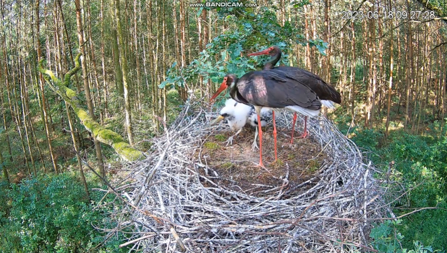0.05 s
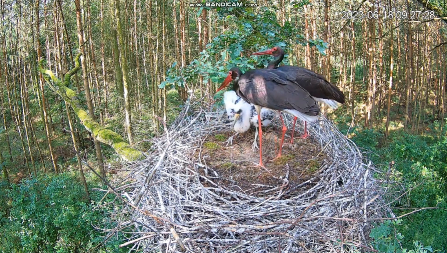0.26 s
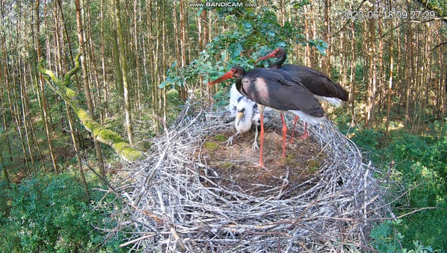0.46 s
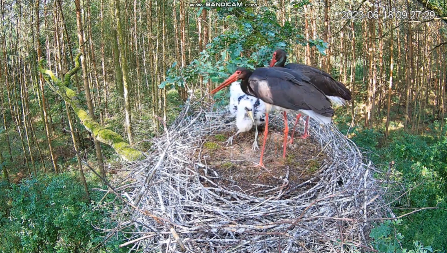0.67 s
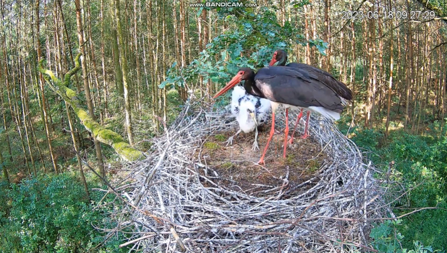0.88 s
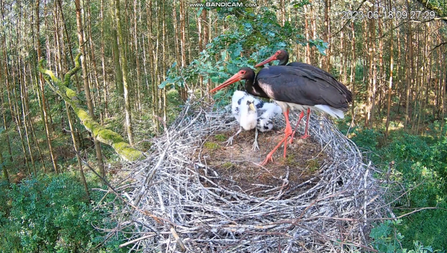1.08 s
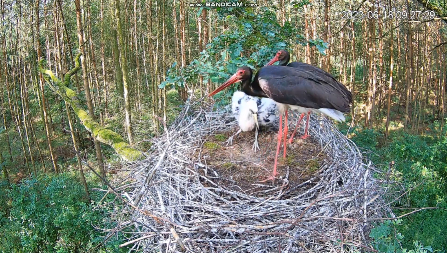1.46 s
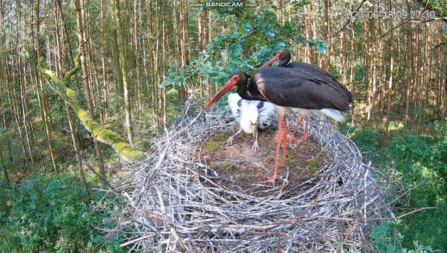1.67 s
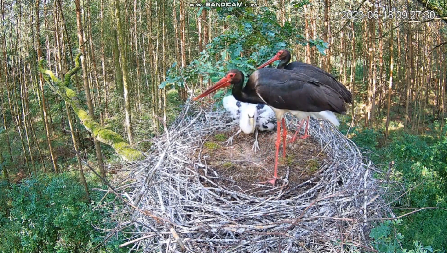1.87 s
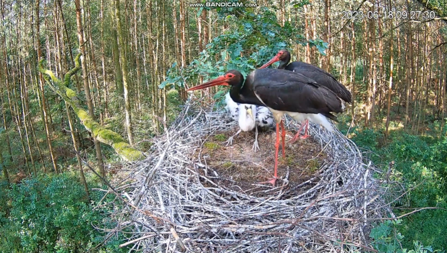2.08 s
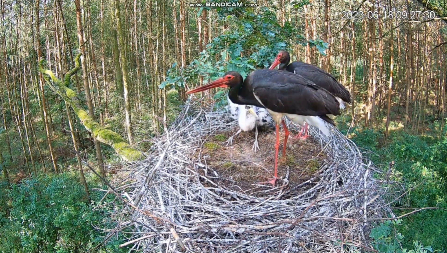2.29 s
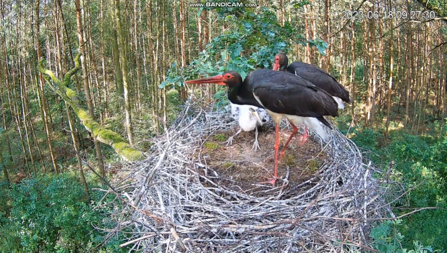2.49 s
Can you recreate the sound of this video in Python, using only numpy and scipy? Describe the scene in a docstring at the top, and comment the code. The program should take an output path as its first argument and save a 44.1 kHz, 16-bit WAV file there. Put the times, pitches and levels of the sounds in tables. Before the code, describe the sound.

Black stork chicks beg close to a nest microphone in three bouts of harsh, high chirps, each ending in a wheeze and low croak. Other storks whine and hiss, with faint twig ticks in quiet woodland.

```python
"""Black stork chicks begging on a treetop nest

Close to a dull nest microphone, with the sound cutting out for instants: three bouts of five harsh calls, each
bout ending in a wheeze and a low croak. A call is a chirp, a held whistle and a sharper chirp over throat rasp.
Other storks on the nest whine and hiss, twigs tick underfoot and a songbird sings far off."""
import sys
import numpy as np
from scipy import signal
from scipy.fft import rfft, irfft
from scipy.io import wavfile
from scipy.ndimage import map_coordinates

SR = 44100
rng = np.random.default_rng(int(sys.argv[2]) if len(sys.argv) > 2 else 0)


def master_out(mix):
    """Clip the mix to full scale and print it as 16-bit PCM to the path in sys.argv[1]."""
    frames = np.transpose(np.atleast_2d(mix))
    ceiling = np.clip(frames, -1, 1)
    pcm = np.round(ceiling * 32767).astype(np.int16)
    wavfile.write(sys.argv[1], SR, pcm)


N = 116865
EDGE_S = .004  # time that a voice takes to start or stop


def begging():
    """The chicks, close by: an opening chirp, a whistle that sags where it is loudest, a closing chirp."""
    # Each row: opening and closing chirp times in seconds, levels in dB of the opening chirp,
    # whistle, closing chirp and rasp, and the factor that stretches the chirps in time.
    calls = np.array([ (.213, 0.286, -36, -33, -23.5, -44, 1.15),
                      (0.337, .395, -26, -28.5, -20.5, -36, 0.79),
                      (0.45, 0.515, -31, -32, -21.5, -36.5, 0.67),
                      (0.567, 0.631, -27.5, -42, -21.5, -31.5, 0.96),
                      (0.677, 0.76, -32, -60, -24, -30.5, 2.36), (1.142, 1.213, -33, -31, -27.5, -39, 0.76),
                      (1.258, 1.325, -41, -43.5, -30.5, -40, 1.08),
                      (1.37, 1.435, -55, -38, -30, -39.5, 1.38),
                      (1.482, 1.55, -44, -34.5, -22.5, -35, 0.98), (1.589, 1.638, -26, -37, -57, -38, 1.8),
                      (1.977, 2.039, -42.5, -32.5, -25, -36.5, 1.7), (2.09, 2.15, -28, -33, -25, -40, 0.57),
                      (2.212, 2.273, -55, -38, -31.5, -40, 1.8),
                      (2.333, 2.393, -36, -36.5, -29.5, -40, 1.04),
                      (2.446, 2.485, -39.5, -48, -51, -44, 1.8)])
    loudest_hz, rise_hz, bend_s = 3143, 390, .0083
    peak_delay_s, attack_s, release_s = .018, .0055, .013
    t, whistles, effort = clock(), np.zeros(N), np.zeros(N)
    shake = 1 + .006 * walk(450) + .015 * walk(25)
    for start, end, _, whistle_db, _, rasp_db, _ in calls:
        near = (t > start - .02) & (t < end + .02)
        from_peak = t[near] - start - peak_delay_s
        hz = loudest_hz + rise_hz * (1 - np.exp(-(from_peak / bend_s) ** 2))
        swell = np.exp(1 - np.hypot(1, np.minimum(from_peak / attack_s, -from_peak / release_s)))
        whistles[near] += undb(whistle_db) * swell * gate(start, end)[near] * syrinx(hz * shake[near])
        closing_push = 1 + .5 * np.exp(-np.abs(t - end) / .012)
        effort += undb(rasp_db) * gate(start, end + .009) * closing_push
    opening = chirps(calls[:, [0, 2, 6]], low_hz=3180, sweep_hz_per_s=190000,
                     attack_s=.0026, release_s=.005, snap=.6)
    closing = chirps(calls[:, [1, 4, 6]], low_hz=3080, sweep_hz_per_s=230000,
                     attack_s=.0035, release_s=.008, snap=.4)
    return whistles * undb(1.6 * walk(250)) + opening + closing + effort * rasp()


def chirps(rows, low_hz, sweep_hz_per_s, attack_s, release_s, snap):
    """Fluttering chirps that dive to a low pitch and shoot up again; timings hold for a stretch of 1."""
    turn_s, top_hz = .004, 4900
    t, out = clock(), np.zeros(N)
    shake = 1 + .02 * walk(900)
    for at, db, stretch in rows:
        near = np.abs(t - at) < .03
        from_peak = (t[near] - at) / stretch
        hz = low_hz + sweep_hz_per_s * (np.hypot(from_peak - turn_s / 2, turn_s) - turn_s)
        swell = np.exp(np.minimum(from_peak / attack_s, -from_peak / release_s))
        accent = (1 + snap * np.exp(-(from_peak / .002) ** 2)) / (1 + snap)
        top_fade = 1 / (1 + (hz / top_hz) ** 24)
        out[near] += undb(db) * swell * accent * top_fade * syrinx(hz * shake[near])
    return out * undb(2.2 * walk(500))


def syrinx(hz):
    """A whistle whose octave flares up as it crosses the bill resonance."""
    bill_hz, width_hz, octave_db = 6353, 430, 1.5
    phase = phase_of(hz)
    lift = 1 / (1 + ((2 * hz - bill_hz) / width_hz) ** 2) ** 2
    return np.sqrt(2) * (np.sin(phase) + undb(octave_db) * lift * np.cos(2 * phase))


def rasp():
    """Rough throat partials that each wander and flutter, with breath noise between them."""
    # Each row of both: frequency in Hz, relative level in dB.
    partials = [(2010, -10), (3180, 1), (3650, 5), (4900, -6.5), (6350, 1.5)]
    breath_spectrum = [(900, -27.5), (1600, -21), (2000, -8.5), (2450, -10), (3250, 1), (3850, -2.5),
                       (4350, 4), (5600, 2.5), (6350, -0.5), (7100, -20.5), (7800, -51)]
    tones = np.zeros(N)
    for hz, db in partials:
        level = undb(db + 3 * walk(130))
        shake = 1 + .028 * walk(55) + .019 * walk(700)
        tones += level * np.sin(phase_of(hz * shake))
    breath = colour(noise() * undb(2.5 * walk(400)), breath_spectrum)
    return tones / tones.std() + undb(-11) * breath


def squeals():
    """Brief rough glides where a voice cracks."""
    # Each row: time in seconds, pitch in Hz, glide in Hz per second, level in dB.
    cracks = [(0.75, 3790, -15000, -25), (1.558, 4260, 110001, -24.5), (1.577, 4690, -90000, -24),
              (1.917, 3100, 150000, -38.5)]
    t, out = clock(), np.zeros(N)
    shake = 1 + .025 * walk(800)
    for at, hz, glide, db in cracks:
        swell = np.exp(-((t - at) / .0045) ** 2)
        out += undb(db) * swell * syrinx((hz + glide * (t - at)) * shake)
    return out


def wheeze_and_croak():
    """A bout ends in a wheeze that breaks into slow throat pulses, which ring low as a croak."""
    # Each row: wheeze start, croak start and their end in seconds, wheeze and croak levels in dB.
    bout_ends = [(0.777, 0.811, 0.84, -32.5, -37.5), (1.576, 1.649, 1.6825, -38, -41),
                 (2.424, 2.5, 2.527, -49, -43.5)]
    # Each row: frequency in Hz, relative level in dB.
    croak_spectrum = [(60, -29), (130, -27), (205, 0), (360, -4), (520, -13.5), (800, -52)]
    pulse_hz = 110.87
    cycles = phase_of(pulse_hz * (1 + .25 * walk(90))) / (2 * np.pi)
    pulses = np.diff(np.floor(cycles), prepend=0)
    croak = colour(pulses + .024 * noise(), croak_spectrum)
    puffs = .55 + 1.4 * np.exp(-(cycles % 1) / .15)
    wheeze, out = rasp(), np.zeros(N)
    for start, croak_start, end, wheeze_db, croak_db in bout_ends:
        pulsing = gate(croak_start, end)
        out += undb(croak_db) * pulsing * croak
        out += undb(wheeze_db) * gate(start, end) * (1 + pulsing * (puffs - 1)) * wheeze
    return out


def whines():
    """Other storks on the nest: hoarse, drawn-out tones that gain overtones with effort."""
    # One list a whine. Each row: time in seconds, pitch in Hz, level in dB.
    contours = [
        [(.49, 1421, -61.5), (.64, 1556, -52.5), (.86, 1709, -41), (.985, 1635, -42.5), (1.01, 1540, -68.5)],
        [(1.255, 1050, -57), (1.43, 1333, -65), (1.67, 1453, -42.5)],
        [(2.185, 1158, -62), (2.25, 1276, -60)],
        [(2.295, 1027, -64.5), (2.38, 1089, -51), (2.43, 1342, -60), (2.51, 1453, -46.5), (2.585, 956, -65)],
    ]
    # Relative level in dB of each harmonic at full effort, fundamental first.
    harmonics_db = [1.5, 2.5, -6, -42]
    full_effort_db = -44
    t, out = clock(), np.zeros(N)
    shake = 1 + .024 * walk(500) + .008 * walk(50)
    for contour in contours:
        times, hz, db = np.array(contour).T
        phase = phase_of(np.interp(t, times, hz) * shake)
        level_db = np.interp(t, times, db)
        effort = undb(level_db - full_effort_db)
        tone = sum(gain * np.sin(k * phase) * (effort if k > 1 else 1)
                   for k, gain in enumerate(undb(harmonics_db), 1))
        out += tone * undb(level_db) * gate(times[0], times[-1])
    return out * undb(2.2 * walk(400) + 2.8 * walk(35))


def hiss():
    """A stork's hoarse, voiceless call through a low throat resonance."""
    # Each row: time in seconds, level in dB.
    contour = [(0, -62), (0.153, -49), (0.178, -100.5), (.52, -89.5), (0.62, -40.5), (0.798, -46),
               (1.131, -62), (1.895, -92), (1.913, -43), (2.125, -38), (2.164, -73.5), (2.59, -85),
               (2.645, -49.5)]
    # Each row: frequency in Hz, relative level in dB.
    throat_spectrum = [(900, -35), (1600, -16), (2000, 2), (2300, 1.5), (2600, -9), (3300, -5.5),
                       (4800, -18), (7500, -35)]
    times, db = np.array(contour).T
    breath = noise() * undb(2.9 * walk(250))
    return undb(np.interp(clock(), times, db)) * colour(breath, throat_spectrum)


def woodland():
    """Twigs ticking underfoot, a songbird's falling note far off, and faint air."""
    # Each row: time in seconds, level in dB.
    twigs = [(0.132, -53), (1.059, -53), (1.894, -53.5)]
    # Each row: start and length in seconds, first and final pitch in Hz, level in dB.
    song = [(1.821, 0.079, 6500, 3850, -62)]
    # Each row of both: frequency in Hz, relative level in dB.
    twig_spectrum = [(400, 2), (7000, -16)]
    air_spectrum = [(25, 6), (120, -14.5), (800, -17.5), (4000, -11), (7500, -24)]
    air = undb(-74 + 3.4 * walk(9.3)) * colour(noise(), air_spectrum)
    t, songbird = clock(), np.zeros(N)
    for at, length, high_hz, low_hz, db in song:
        hz = low_hz + (high_hz - low_hz) * np.exp(-np.maximum(t - at, 0) / .007)
        songbird += undb(db) * gate(at, at + length, .0012, .0034) * np.sin(phase_of(hz))
    ticks = sum(undb(db) * gate(at, at, .0016, .003) for at, db in twigs)
    return ticks * colour(noise(), twig_spectrum) + songbird + air


def undb(db):
    """Decibels to gain."""
    return 10 ** (np.asarray(db) / 20)


def clock():
    """Time of every sample in seconds."""
    return np.arange(N) / SR


def colour(x, points):
    """Shape a sound by (Hz, dB) points; rms 1."""
    hz, db = np.array(points).T
    bins_hz = np.maximum(np.arange(N // 2 + 1) * SR / N, 1)
    gain = undb(np.interp(np.log(bins_hz), np.log(hz), db))
    shaped = irfft(rfft(x) * gain, N)
    return shaped / shaped.std()


def noise():
    """White noise."""
    return rng.standard_normal(N)


def walk(rate):
    """A smooth curve through `rate` random values a second; spread 1."""
    curve = map_coordinates(noise(), [clock() * rate + 2], order=3, mode="mirror")
    return curve / curve.std()


def gate(start, end, attack_s=EDGE_S, release_s=EDGE_S):
    """Full from start to end, with exponential skirts."""
    t = clock()
    log_gain = np.minimum(t - start, 0) / attack_s - np.maximum(t - end, 0) / release_s
    return np.exp(np.maximum(log_gain, -20))


def phase_of(hz):
    """Running phase of a pitch curve."""
    return 2 * np.pi * np.cumsum(hz) / SR


def scene():
    """The storks close by, with a faint scatter from the trees, in mono."""
    storks = begging() + squeals() + wheeze_and_croak() + whines() + hiss()
    trees = noise() * np.exp(-clock() / .025)
    echo = signal.fftconvolve(storks, trees / np.linalg.norm(trees))[:N]
    return (storks + undb(-27) * echo + woodland())[None]


def record(dry):
    """The sound cuts out for instants, and the nest microphone loses the top of the treble."""
    # Each row: start and length in seconds.
    dropouts = [(.6738, .003), (1.6338, .004), (1.699, .03), (1.9535, .003)]
    top_hz = 7500
    cuts = sum(gate(at, at + length, .0001, .0001) for at, length in dropouts)
    lowpass = signal.butter(12, top_hz, fs=SR, output="sos")
    return signal.sosfiltfilt(lowpass, dry * (1 - np.minimum(cuts, 1)))


dry = scene()
out = record(dry)
master_out(out)
```